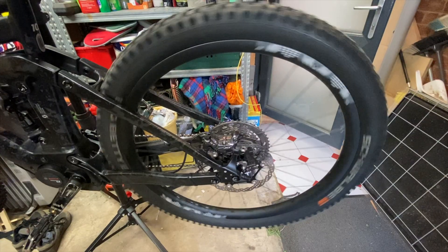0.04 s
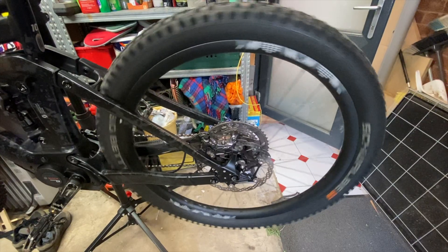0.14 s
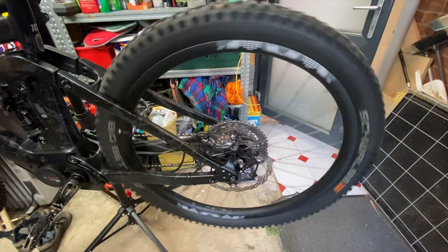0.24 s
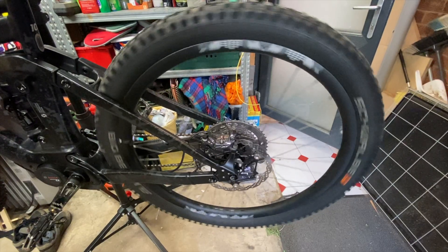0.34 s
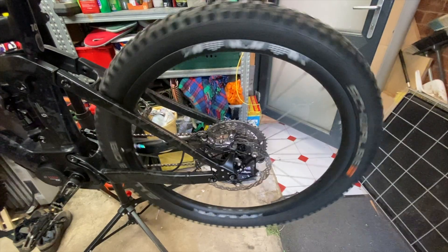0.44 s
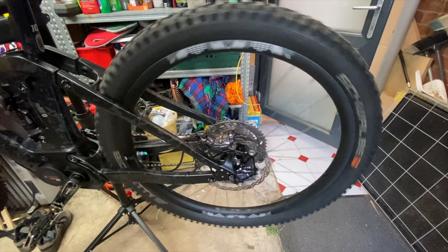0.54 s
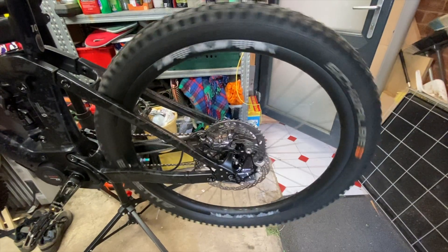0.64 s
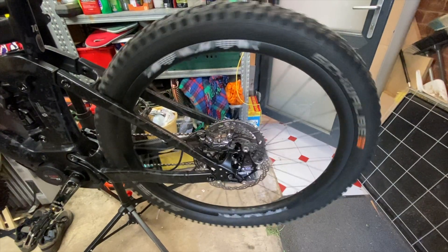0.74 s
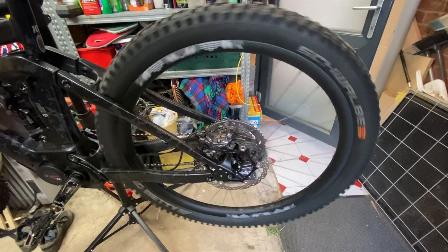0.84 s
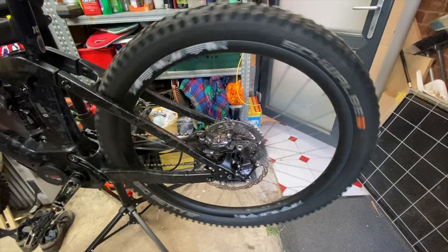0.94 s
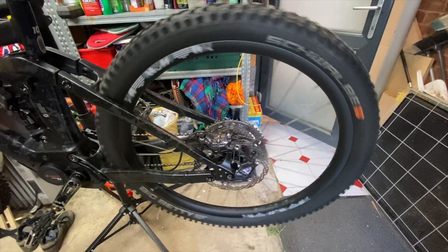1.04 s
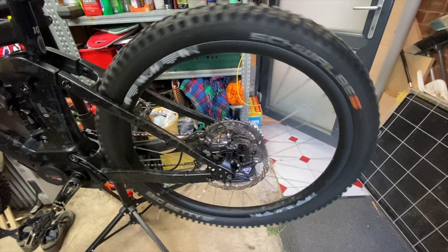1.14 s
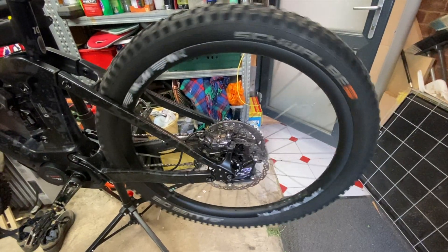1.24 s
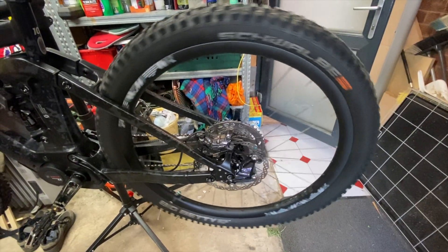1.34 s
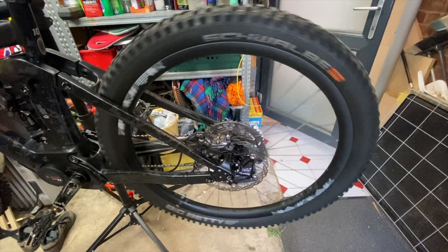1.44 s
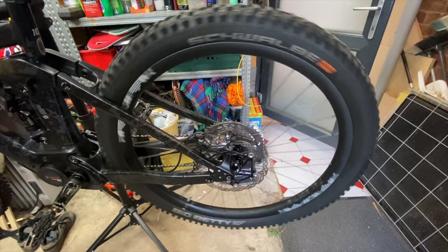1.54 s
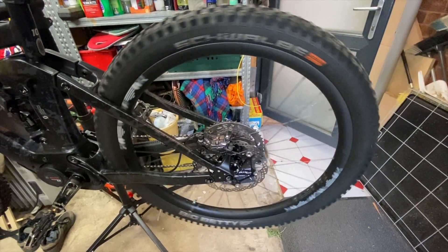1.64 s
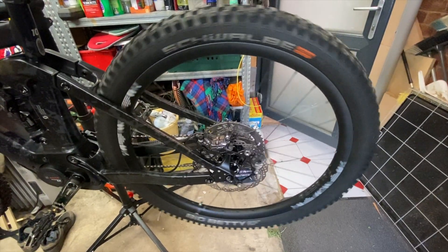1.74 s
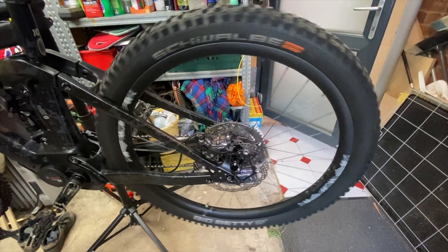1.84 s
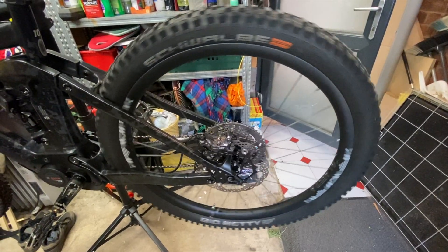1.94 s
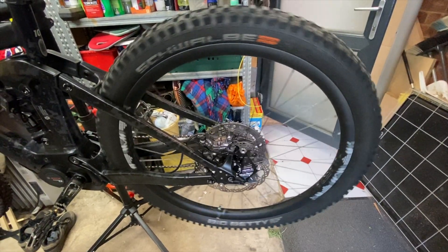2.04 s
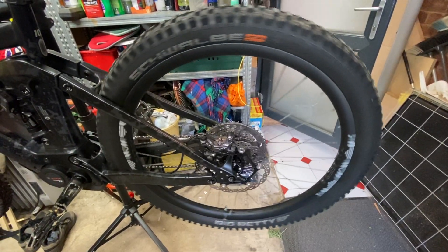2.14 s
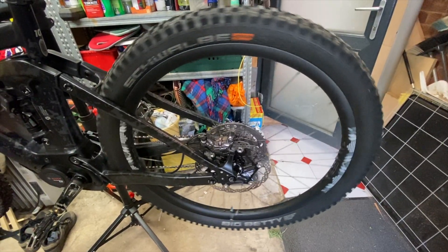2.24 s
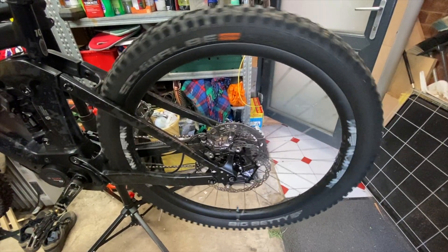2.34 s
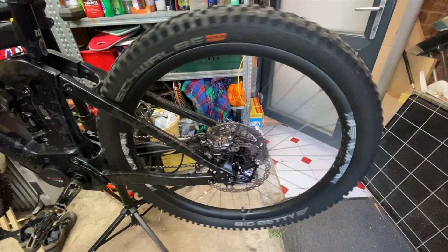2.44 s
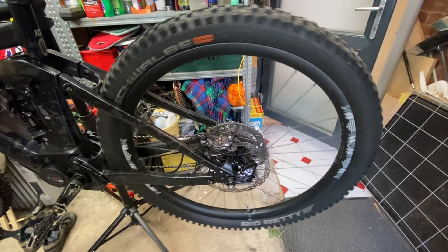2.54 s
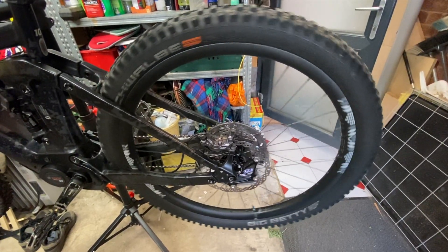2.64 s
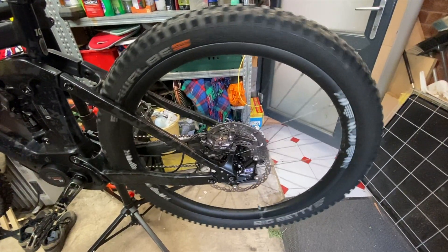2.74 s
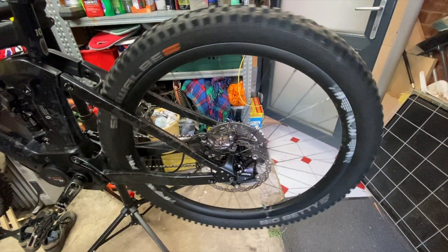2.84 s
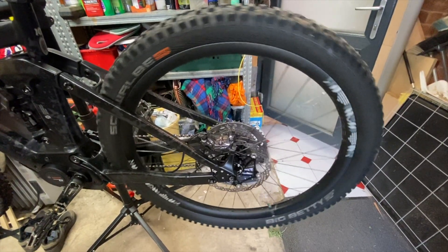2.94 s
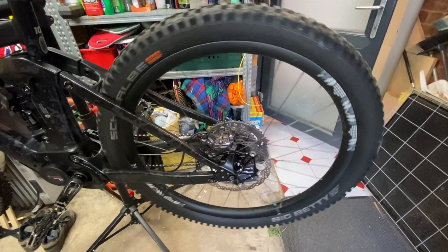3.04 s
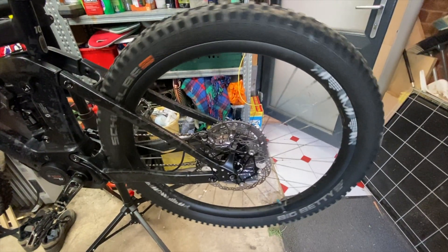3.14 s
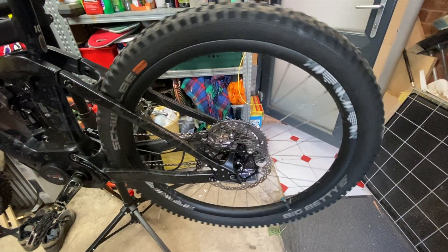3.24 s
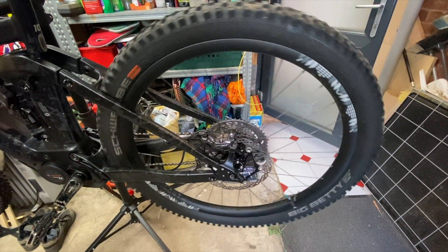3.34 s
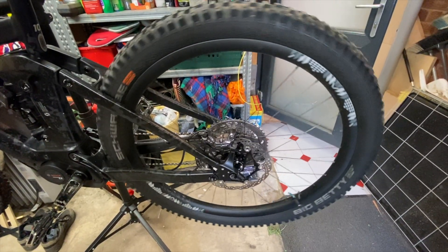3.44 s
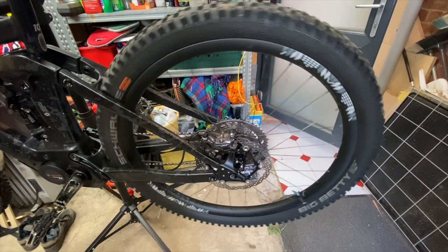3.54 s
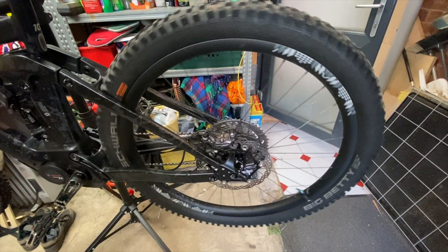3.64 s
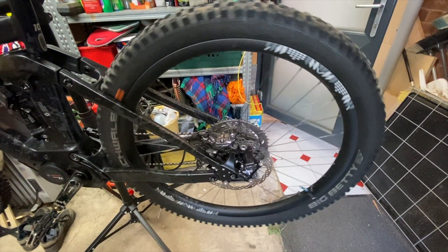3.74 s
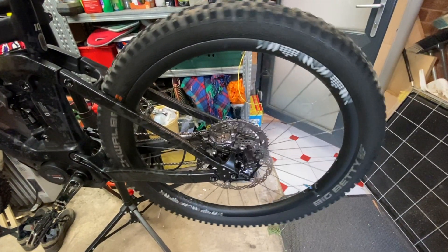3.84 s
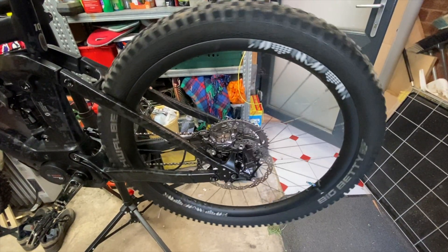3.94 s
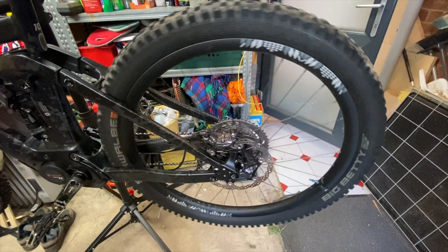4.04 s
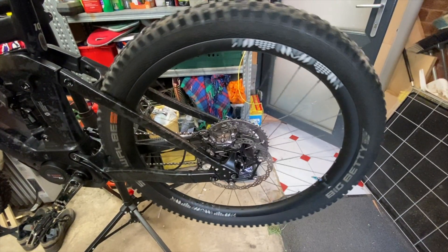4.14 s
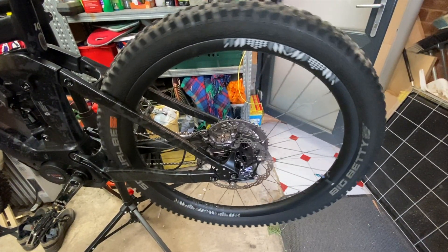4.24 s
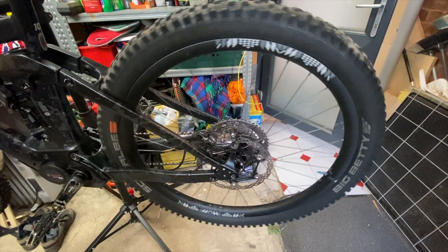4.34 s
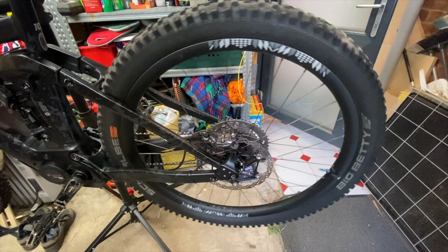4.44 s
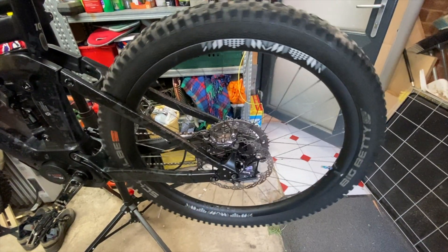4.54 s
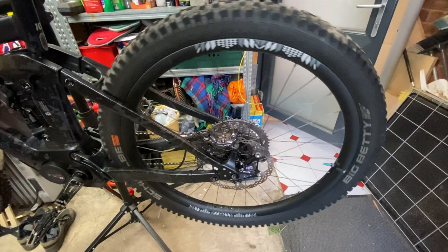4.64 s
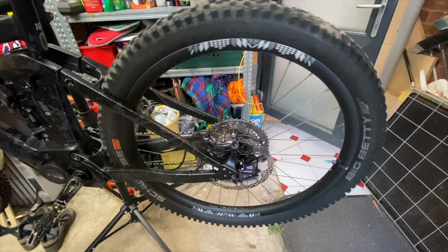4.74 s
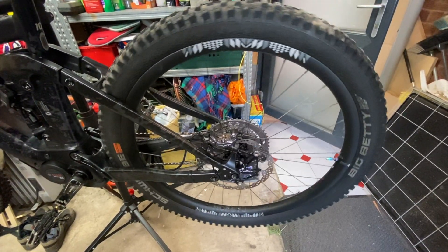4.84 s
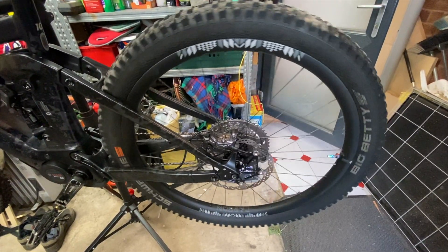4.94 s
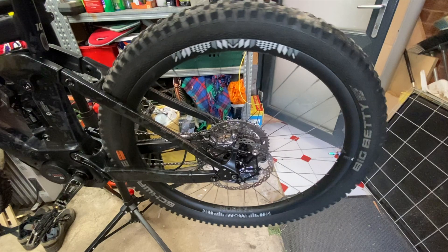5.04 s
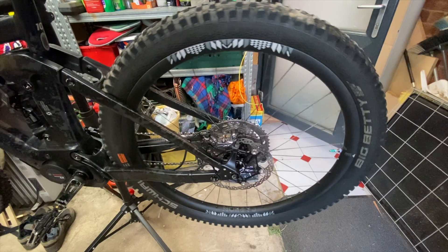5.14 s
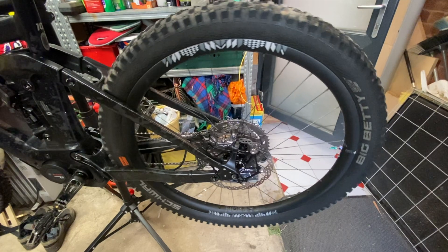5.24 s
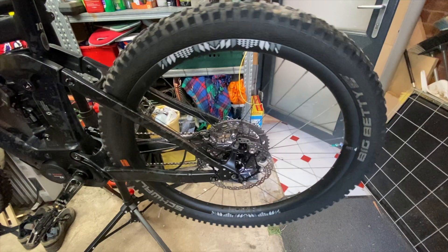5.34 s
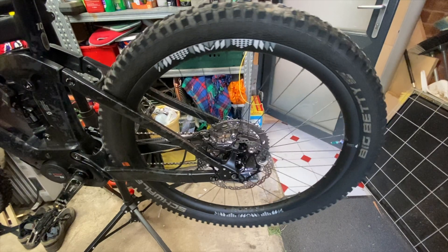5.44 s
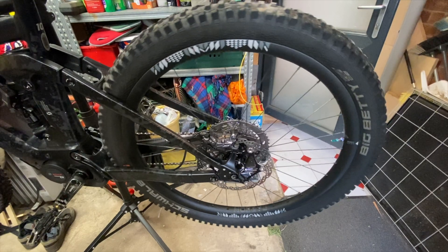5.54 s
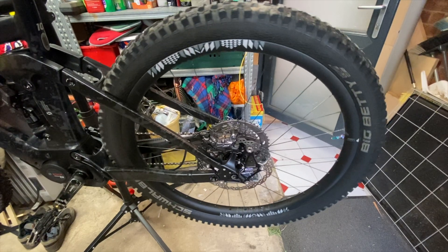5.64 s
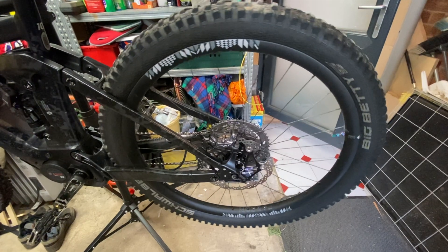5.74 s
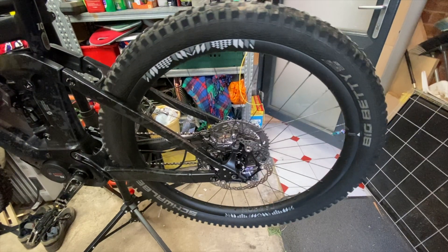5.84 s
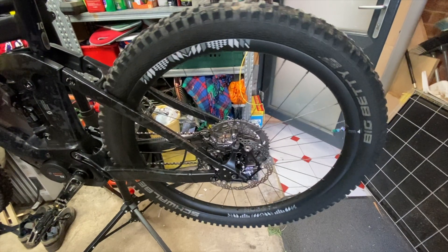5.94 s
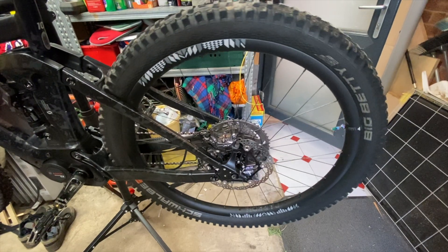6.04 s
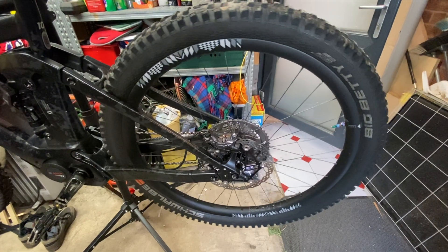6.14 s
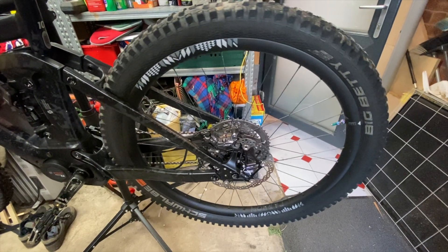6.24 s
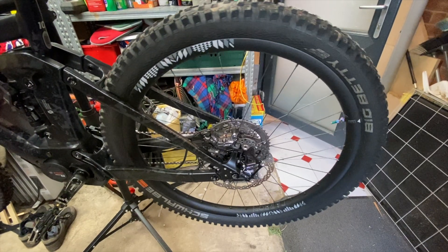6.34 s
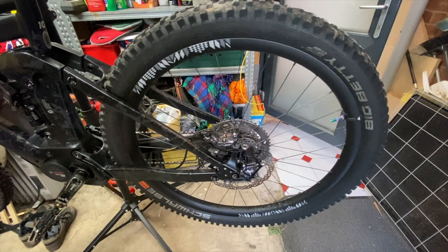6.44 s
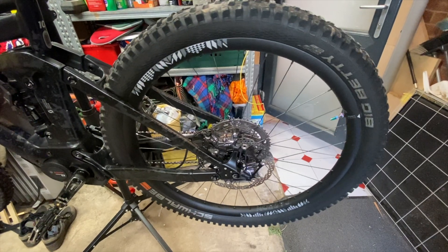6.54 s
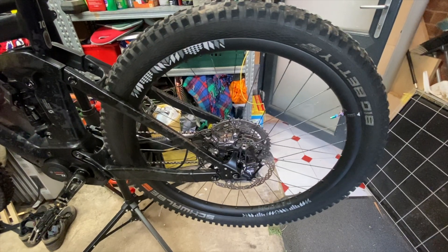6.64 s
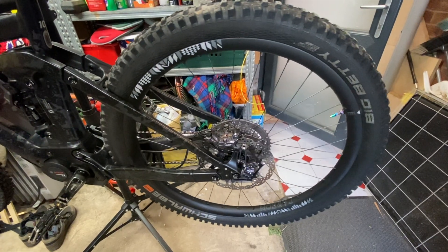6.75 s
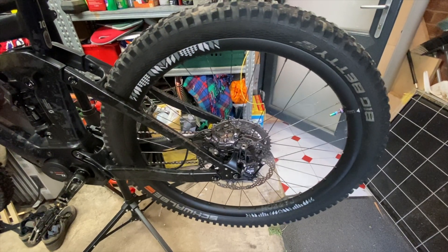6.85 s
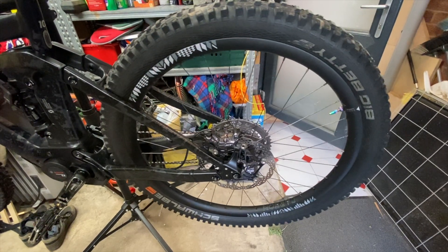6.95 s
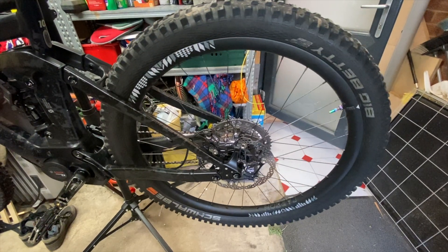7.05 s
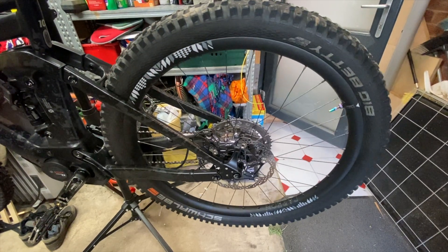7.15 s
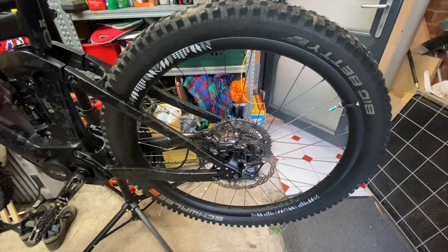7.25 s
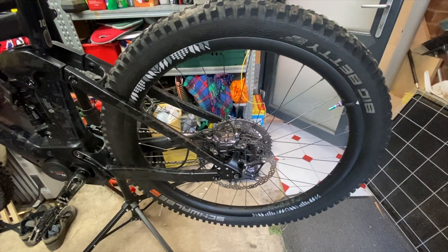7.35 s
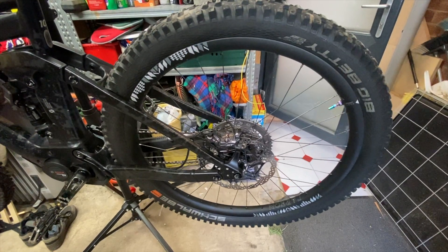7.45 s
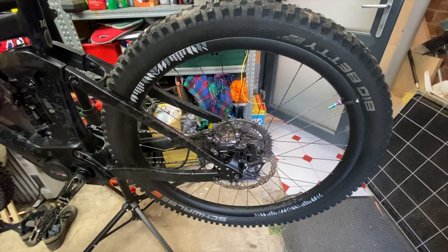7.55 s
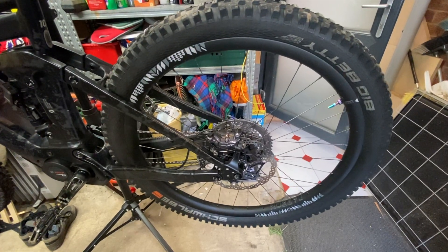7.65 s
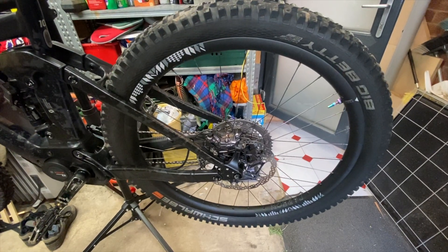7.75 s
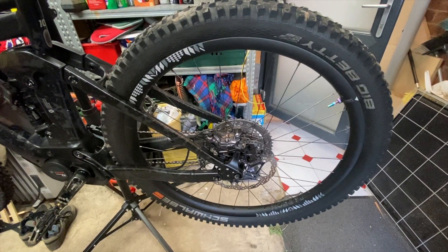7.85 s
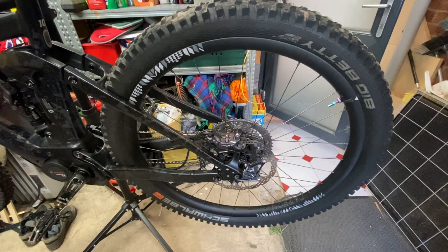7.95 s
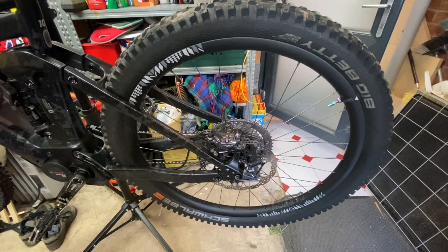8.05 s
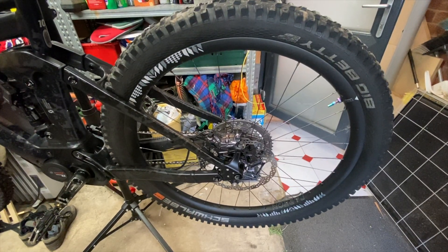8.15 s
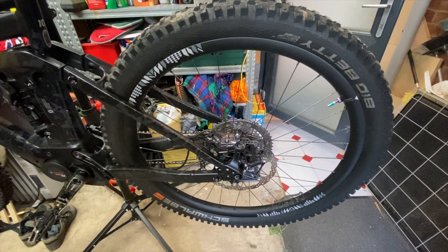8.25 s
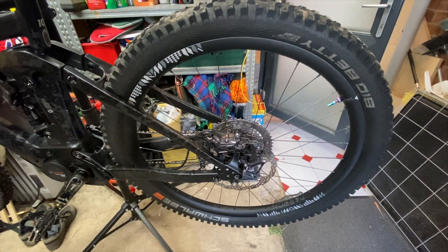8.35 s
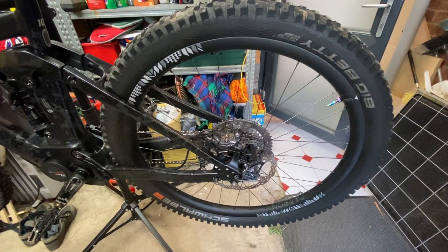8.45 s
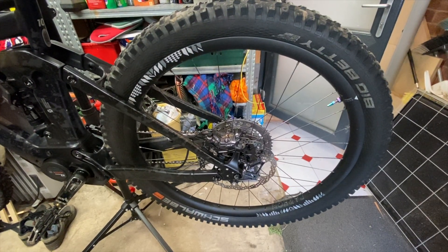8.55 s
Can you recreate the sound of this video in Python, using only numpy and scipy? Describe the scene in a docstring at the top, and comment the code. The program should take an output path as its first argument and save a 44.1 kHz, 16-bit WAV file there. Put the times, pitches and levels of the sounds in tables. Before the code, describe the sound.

Close up in a small cluttered workshop, a bicycle's rear wheel freewheels. Sharp metallic ratchet clicks start as a fast buzzing tick, nearly thirty a second, and slow continuously. Each click rings briefly and leaves a short room tail. Soft finger rubs on the camera come early and past halfway, with dull scuffs between. The last clicks spread apart, break into tiny double or triple ticks and stop, leaving faint rumble and hiss.

```python
"""A small workshop rumbles and hisses (shaped noise) under a faint hum (wavering sines) throughout.
From the start a bicycle's rear wheel coasts on a repair stand: three freehub pawls snap at every ratchet
tooth (noise bursts), hub, spokes and disc ring (damped modes) and the room answers (decaying noise tails).
Fingers shift on the camera early and again past halfway; dull scuffs, light ticks and faint squeaks come and go.
As the wheel slows the pawls drift apart into separate clicks, until it stops shortly before the end."""
import sys
import numpy as np
from scipy import signal
from scipy.fft import rfft, irfft, next_fast_len
from scipy.io import wavfile
from scipy.ndimage import map_coordinates

SR = 44100
rng = np.random.default_rng(int(sys.argv[2]) if len(sys.argv) > 2 else 0)


def transcribe(u):
    """Save the signal u as a 16-bit wav file named by the first command-line argument.

    u: samples, shape (n,) or (channels, n), limited to [-1, 1]; the rate is SR.
    q: integer samples, one column per channel.
    """
    v = np.clip(np.atleast_2d(u).T, -1, 1)
    q = np.round(v * 32767).astype(np.int16)
    wavfile.write(sys.argv[1], SR, q)


N = 379680


def amp(db):
    """Decibels to an amplitude factor."""
    return 10 ** (np.asarray(db) / 20)


def unit(x):
    """Scale a sound to an RMS of one."""
    return x / np.sqrt(np.mean(x ** 2) + 1e-20)


def along(points, hz):
    """Read (frequency [Hz], value) points on a log frequency axis."""
    f, v = np.transpose(points)
    return np.interp(np.log(hz + 1), np.log(f + 1), v)


def add(track, s, sound):
    """Mix a sound into a track at time s [s]."""
    start = max(round(s * SR), 0)
    part = track[..., start:start + sound.shape[-1]]
    part += sound[..., :part.shape[-1]]


def filtered(x, response):
    """Multiply the spectrum of x by a response of frequency, padded so that tails do not wrap round."""
    m = 2 * next_fast_len((N + SR) // 2)
    spectrum = rfft(x, m) * response(np.fft.rfftfreq(m, 1 / SR))
    return irfft(spectrum, m)[..., :N]


def causal(points, hz):
    """Minimum-phase response of a (frequency [Hz], gain [dB]) shape: the energy comes as early as it can."""
    cepstrum = irfft(np.log(amp(along(points, hz))))
    half = len(cepstrum) // 2
    # fold the backward half of the cepstrum onto the forward half
    cepstrum[1:half] *= 2
    cepstrum[half + 1:] = 0
    return np.exp(rfft(cepstrum))


def resonance(hz, centre, width):
    """Causal response of one damped mode, with unit gain at its centre."""
    return 1j * hz * width / (centre ** 2 - hz ** 2 + 1j * hz * width)


def stereo(pair, alike):
    """Blend two unrelated signals into a left and right of a given correlation."""
    def mid_side(hz):
        angle = np.arccos(np.clip(along(alike, hz), -.97, .97)) / 2
        return np.array([np.cos(angle), np.sin(angle)])
    mid, side = filtered(pair, mid_side)
    return np.array([mid + side, mid - side])


# rumble colour, scaled to unit RMS: (frequency [Hz], relative level [dB])
RUMBLE_COLOUR = [(20, -35.5), (32, -24), (45, -10), (62, -2.5), (80, -7), (102, -7), (125, -16), (240, -21),
                 (400, -26), (1000, -45.5), (4000, -63)]
# rumble level before the rumble_db trim: (time [s], level [dB])
RUMBLE_LEVEL = [(0, -74), (1.0, -76.5), (1.15, -71.5), (2.05, -70), (2.25, -77.5), (5.1, -71), (6.5, -73.5),
                (8.6, -73)]
# hiss colour, scaled to unit RMS: (frequency [Hz], relative level [dB])
HISS_COLOUR = [(150, -20), (370, -4.5), (700, -4.5), (1200, -8), (2500, -15), (6500, -16.5), (9500, -19),
               (15500, -26), (16300, -43)]
# hum partials: (frequency [Hz], RMS level [dB])
HUM = [(60, -82), (99, -79), (199.5, -84.5)]
# likeness of left and right, also for fingers and scuffs: (frequency [Hz], correlation)
WIDE_ALIKE = [(60, 0.63), (300, 0.33), (2000, 0.17), (10000, 0.27)]


def background(rumble_db=3.0, hiss_db=-81, waver=0.62):
    """Shaped noise makes rumble and hiss; sines with wandering phase (waver [rad]) make the hum."""
    t = np.arange(N) / SR

    def noise(colour):
        white = rng.standard_normal((2, N))
        return unit(filtered(white, lambda hz: amp(along(colour, hz))))

    rumble = amp(rumble_db + np.interp(t, *np.transpose(RUMBLE_LEVEL))) * noise(RUMBLE_COLOUR)
    hiss = amp(hiss_db) * noise(HISS_COLOUR)
    hum = np.zeros(N)
    for hz, db in HUM:
        # four random points a second, smoothly joined
        wander = map_coordinates(rng.standard_normal(size=40), [t * 4])
        hum += amp(db) * unit(np.sin(2 * np.pi * hz * t + waver * wander))
    return stereo(rumble + hiss, WIDE_ALIKE) + hum


# the coasting wheel: (time [s], speed [ratchet teeth/s])
WHEEL_SPEED = [(0, 28.605), (1, 22.442), (1.3, 20.993), (3, 15.66), (4, 12.657), (4.9, 10.017),
               (5.4, 8.473), (6.4, 5.499), (7.3, 2.852), (8.2, 0)]
# drifting spacing of the pawls: (time [s], turn from first fall to last [teeth])
PAWL_SPREAD = [(0, 0.09), (.4, 0.099), (.65, 0.066), (1.75, 0.052), (2.9, 0.095), (4.6, .074), (7.35, .12),
               (7.87, .097)]


def tooth_falls(first_tooth=.028):
    """Integrate speed into turn; each tooth gives a first fall, the lag of its last fall and the speed.

    first_tooth is the turn [teeth] before the first pawl falls.
    """
    t = np.arange(N) / SR
    speed = np.interp(t, *np.transpose(WHEEL_SPEED))
    turn = np.cumsum(speed) / SR
    teeth = np.arange(first_tooth, turn[-1])
    first = np.interp(teeth, turn, t)
    spread = np.interp(first, *np.transpose(PAWL_SPREAD))
    last = np.interp(teeth + spread, turn, t)
    return first, last - first, np.interp(first, t, speed)


def strike(grain, rise, t60):
    """A crowd of short-lived metal modes: noise that swells quickly and dies, scaled to unit RMS."""
    t = np.arange(grain.shape[-1]) / SR
    swell = 1 - np.exp(-(t / rise) ** 2)
    return unit(grain * swell * amp(-60 * t / t60))


# pawls: (place between first and last fall [0-1], gain at speed [dB], gain at a crawl [dB],
#         share of noise power kept from tooth to tooth [0-1])
PAWLS = [(0, -3, -5, 0.25), (.36, -9.5, 0, 0.23), (1, 1, 1, 0.45)]
# snap force against wheel speed: (speed [teeth/s], level [dB])
SNAP_FORCE = [(1, -39.5), (9.7, -38.5), (13, -36.5), (16.5, -36.5), (20, -37), (26, -36)]


def pawls(scatter_db=1.48, jitter_s=.0004, crawl_lag_s=0.025):
    """Every fall is a blow on the hub and a burst of metal chatter that changes from tooth to tooth."""
    chatter, blows = np.zeros((2, N)), np.zeros((1, N))
    size = SR // 32
    starts, lags, speeds = tooth_falls()
    levels = np.interp(speeds, *np.transpose(SNAP_FORCE))
    for place, fast_db, slow_db, alike in PAWLS:
        grain = rng.standard_normal((2, size))
        for s, db, lag in zip(starts, levels, lags):
            fresh = rng.standard_normal((2, size))
            grain = np.sqrt(alike) * grain + np.sqrt(1 - alike) * fresh
            # the balance of the pawls shifts as their falls spread out in time
            pawl_db = np.interp(lag, [0, crawl_lag_s], [fast_db, slow_db])
            force = amp(db + pawl_db + scatter_db * rng.normal())
            fall = s + place * (lag + jitter_s * rng.normal())
            add(chatter, fall, force * strike(grain, rise=0.00079, t60=0.042))
            # one sample with the energy of a whole burst
            add(blows, fall, force * np.full(1, np.sqrt(size)))
    return chatter, blows


# decay of the room: (frequency [Hz], time to fall 60 dB [s])
ROOM_T60 = [(300, 0.49), (1100, 0.26), (2800, 0.21), (7400, 0.24), (15000, 0.15)]
# colour of the room: (frequency [Hz], gain [dB])
ROOM_GAIN = [(500, -1.5), (2400, 2), (7000, -3), (12000, -5)]


def workshop(x, build_s=0.0042, steady=0.43, count=9):
    """The cluttered room's short noise tail; all but its steady share is redrawn count times a second."""
    wet, size = np.zeros((2, N)), SR // count
    starts = range(0, N, size)
    noise = rng.standard_normal(size=(len(starts) + 1, 2, 11000))
    pattern = np.sqrt(steady) * noise[0] + np.sqrt(1 - steady) * noise[1:]
    hz, t, z = signal.stft(pattern, SR, nperseg=256)
    # each band decays at its own rate
    decay = amp(-60 * t / along(ROOM_T60, hz)[:, None])
    tails = signal.istft(z * decay, SR, nperseg=256)[1]
    tails *= 1 - np.exp(-np.arange(tails.shape[-1]) / SR / build_s)
    for start, tail in zip(starts, tails):
        tail = tail / np.linalg.norm(tail[0])
        add(wet, start / SR, signal.fftconvolve(x[:, start:start + size], tail, axes=1))
    return filtered(wet, lambda hz: amp(along(ROOM_GAIN, hz)))


CENTRE = np.array([[1], [0]])  # feeds only the part that reaches both microphones alike
# colour of chatter and ringing: (frequency [Hz], gain [dB])
SNAP_COLOUR = [(100, -22), (350, -17.5), (650, -7), (1000, -10.5), (1300, -4), (1750, -8.5), (2200, 2),
               (3100, -3), (4200, -1.5), (8000, 3), (10000, -1), (12500, 1), (15600, -2.5), (16300, -35.5)]
# modes of hub, spokes and disc: (frequency [Hz], width [Hz], peak gain before the snap colour [dB])
WHEEL_MODES = [(691, 28, 1), (850, 90, -8), (1280, 48, 4), (2038, 75, -2), (2160, 55, -3), (2341, 50, -1),
               (2485, 75, 1), (2984, 28, -2), (4020, 170, 0), (5365, 250, -3), (6074, 55, -3),
               (7698, 220, -4), (8520, 260, -5), (11222, 80, 1), (11472, 80, -1), (14605, 36, 4)]


def freehub(chatter_db=-6.0, room_db=-6.5, ring_db=0, ring_room_db=-7):
    """The pawls' chatter, the ringing modes their blows excite and the room's answer to both."""
    chatter, blows = pawls()
    snaps = amp(chatter_db) * chatter + amp(room_db) * workshop(blows)

    def modes(hz):
        total = 0
        for k, (centre, width, db) in enumerate(WHEEL_MODES):
            total = total + (-1) ** k * amp(db) * resonance(hz, centre, width)
        return total

    # the direct ring arrives from the middle, its echoes from all round
    drive = amp(ring_db) * blows * CENTRE + amp(ring_room_db) * workshop(blows)
    ringing = filtered(drive, modes)
    return filtered(snaps + ringing, lambda hz: causal(SNAP_COLOUR, hz))


# finger shifts, levels before envelope and channel trims: (time [s], thud level [dB], rub level [dB])
GRIP = [(0.228, -59, -53.5), (0.33, -62, -55), (0.375, -62.5, -55.5), (0.478, -68, -59.5), (0.66, -69, -64),
        (4.802, -57, -63), (4.868, -56.5, -61), (4.95, -62, -60.5), (5.088, -62, -59.5), (5.225, -70, -62)]
# thud, then rub resonance of the case: (frequency [Hz], half the width of each filter stage [Hz])
CASE = [(240, 49), (455, 82)]


def grip(slip_hz=40, slip_db=1.5, left_db=-1.5, right_db=4.0, rise_s=0.0055, t60_s=0.51):
    """Fingers stick and slip on the camera case, close to its right microphone: unsteady resonant noise."""
    t = np.arange(N) / SR
    slips = amp(slip_db * map_coordinates(rng.standard_normal(size=800), [t * slip_hz]))
    shift = (1 - np.exp(-t[:SR] / rise_s)) * amp(-60 * t[:SR] / t60_s)
    track = np.zeros((2, N))
    for column, (centre, width) in enumerate(CASE, 1):
        rubbing = slips * rng.standard_normal((2, N))
        # squaring the response makes two stages in a row
        body = unit(filtered(rubbing, lambda hz: resonance(hz, centre, 2 * width) ** 2))
        power = np.zeros(N)
        for row in GRIP:
            add(power, row[0], (amp(row[column]) * shift) ** 2)
        track += body * np.sqrt(power)
    return stereo(track, WIDE_ALIKE) * amp([[left_db], [right_db]])


# scuffs and squeaks: (time [s], level before swell and decay [dB], centre [Hz], width [octaves],
#                      rise [s], time to fall 60 dB [s])
BUMPS = [(1.48, -51.5, 850, 0.36, 0.049, 0.92), (2.92, -54.5, 566, 0.35, .03, 0.88),
         (7.171, -78, 1720, 0.056, 0.052, 0.8), (7.66, -70, 367, 0.046, 0.054, 0.89)]


def bumps():
    """Dull scuffs (wide noise bands) and faint squeaks (narrow ones) that swell and fade."""
    track, t = np.zeros((2, N)), np.arange(SR) / SR
    hz = np.fft.rfftfreq(SR, 1 / SR)
    for s, db, centre_hz, width, rise, t60 in BUMPS:
        band = np.exp(-.5 * (np.log2((hz + 1) / centre_hz) / width) ** 2)
        noise = unit(irfft(rfft(rng.standard_normal((2, SR))) * band))
        swell = 1 - np.exp(-t / rise)
        add(track, s, amp(db - 60 * t / t60) * swell * noise)
    return stereo(track, WIDE_ALIKE)


# light ticks from the bike: (time [s], level before the contact_db lift [dB])
TICKS = [(2.194, -42), (6.697, -49.5), (6.722, -54), (6.77, -53.5), (7.944, -50.5), (8.116, -51.5)]
# colour of a tick: (frequency [Hz], gain [dB])
TICK_COLOUR = [(900, -35), (1350, -16.5), (1600, -0.5), (2300, 0), (3500, -4.5), (5000, -14), (8000, -24),
               (15000, -60)]


def ticks(contact_db=30, room_db=0):
    """Soft, dull contacts: single-sample taps and their answer from the room, both coloured alike."""
    taps = np.zeros((1, N))
    for s, db in TICKS:
        add(taps, s, np.full(1, amp(db + contact_db)))
    heard = taps * CENTRE + amp(room_db) * workshop(taps)
    return filtered(heard, lambda hz: causal(TICK_COLOUR, hz))


# likeness of left and right for the bike, limited to +-0.97 when read: (frequency [Hz], correlation)
BIKE_ALIKE = [(300, 0.18), (1300, 0.35), (2500, 0.0019), (4000, 0.054), (9300, -0.33), (10600, 0.87),
              (11800, 0.22), (12800, -0.51), (13600, -1), (14800, 0.61)]


def scene():
    """The background, the bike close by, the hand on the camera and the scuffs and squeaks."""
    bike = stereo(freehub() + ticks(), BIKE_ALIKE) * amp([[-.2], [.2]])  # left, right [dB]
    return background() + bike + grip() + bumps()


def record(dry, top_hz=16900):
    """The recorder keeps nothing above its band limit."""
    return filtered(dry, lambda hz: hz < top_hz)


dry = scene()
out = record(dry)
transcribe(out)
```